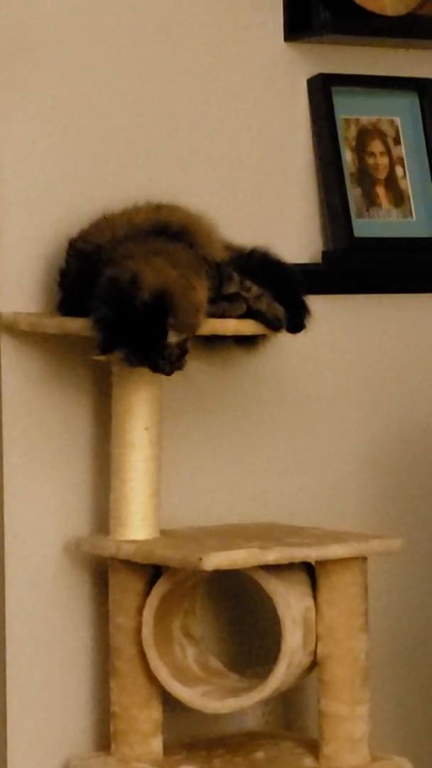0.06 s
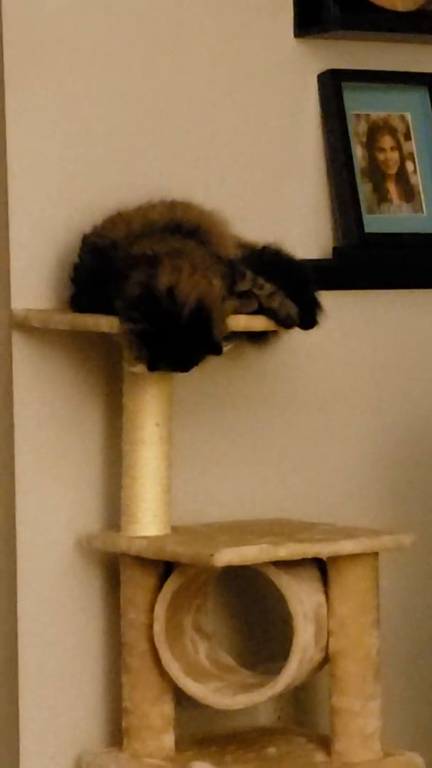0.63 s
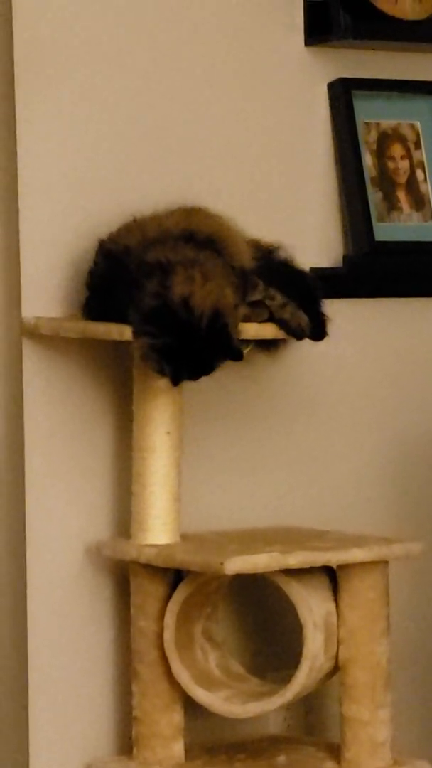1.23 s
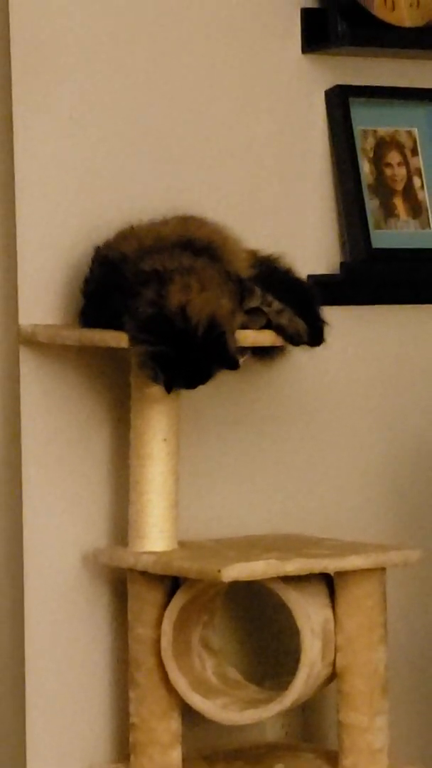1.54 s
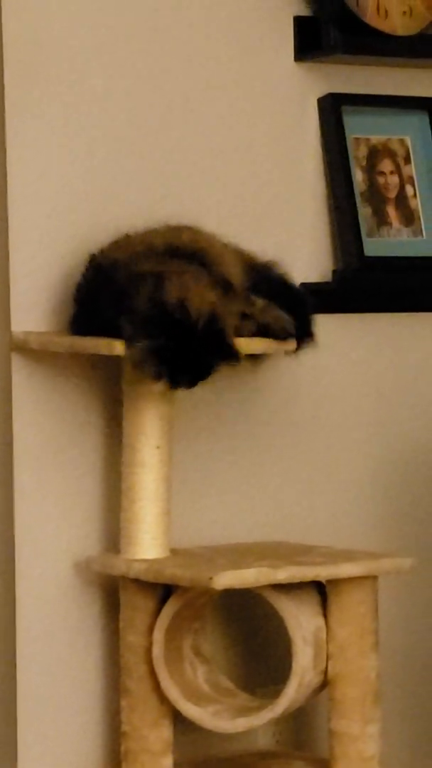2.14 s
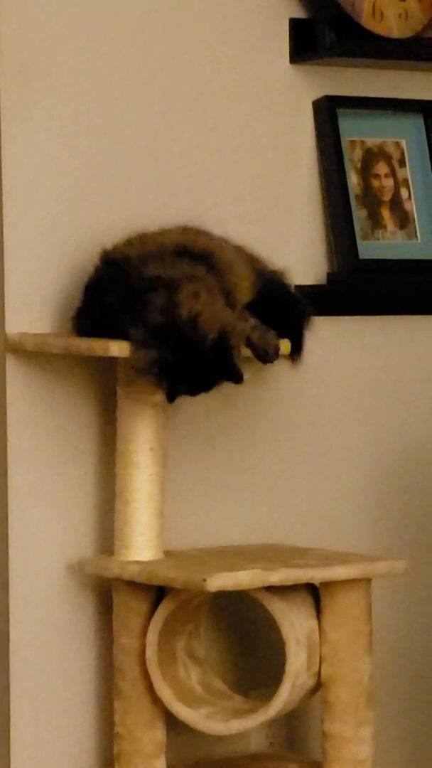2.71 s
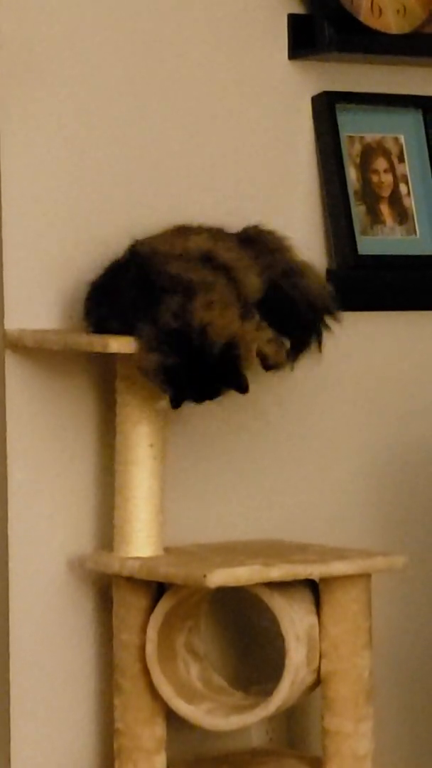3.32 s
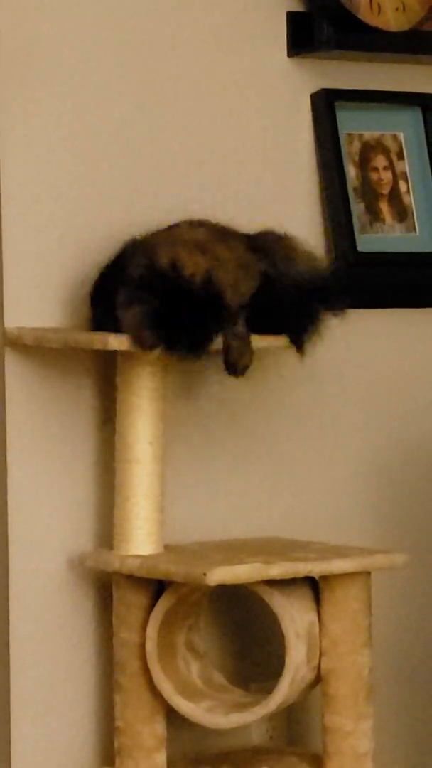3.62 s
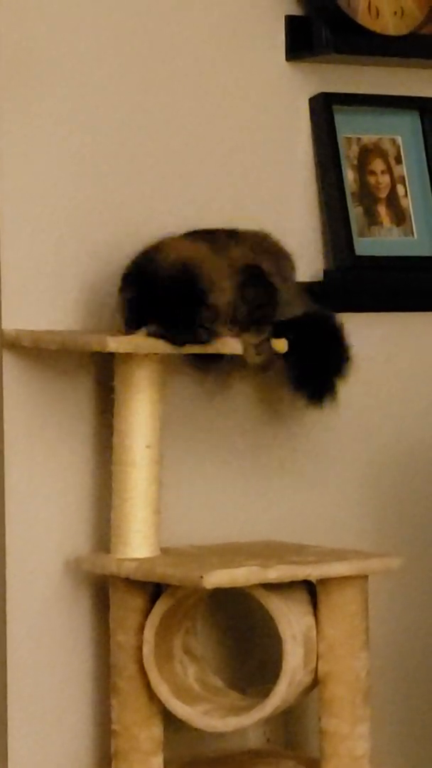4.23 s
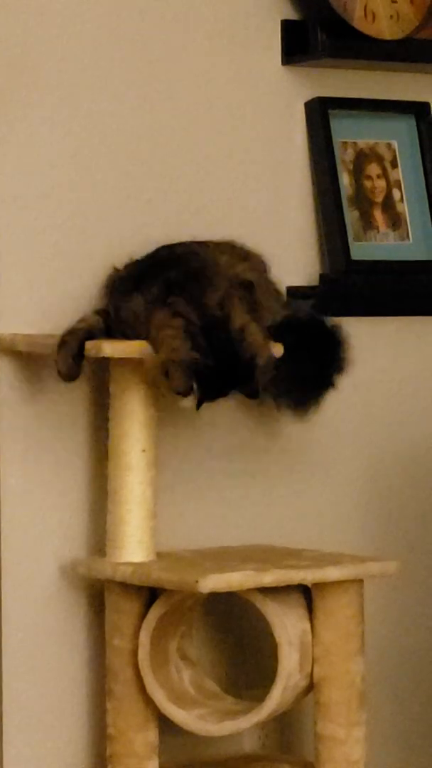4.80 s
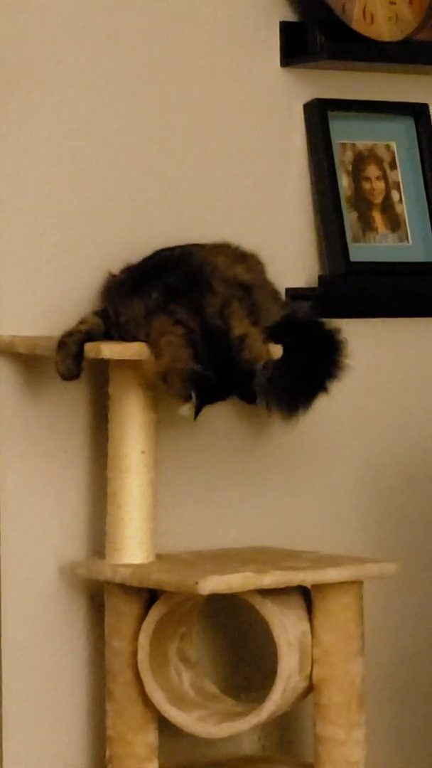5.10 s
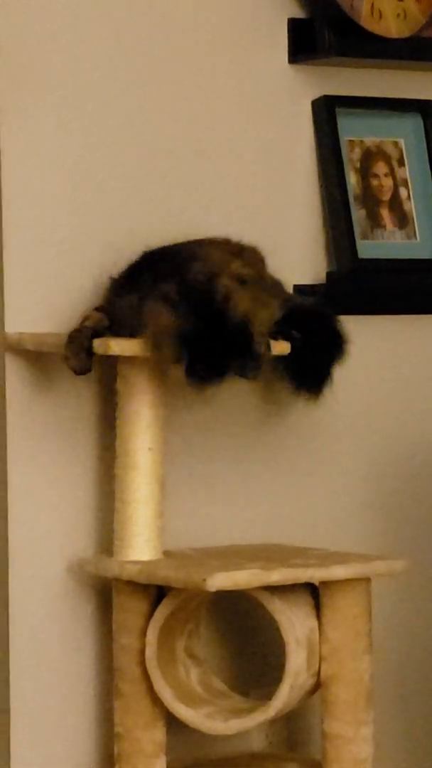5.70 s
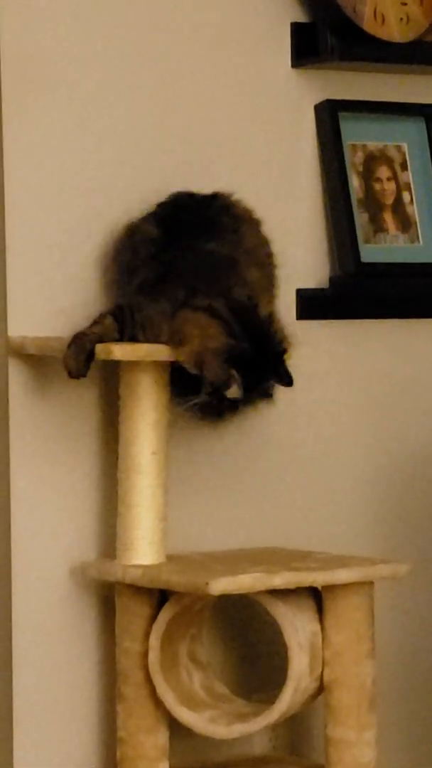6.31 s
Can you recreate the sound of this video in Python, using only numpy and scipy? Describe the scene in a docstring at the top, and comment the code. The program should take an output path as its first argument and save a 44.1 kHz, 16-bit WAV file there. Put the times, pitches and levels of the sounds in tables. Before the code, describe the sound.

A low, throbbing rumble like a purr, possibly an engine heard through the walls, runs throughout in a small, quiet room, with faint hum and microphone hiss. A very faint rustle opens, and a dull, deep thump comes at about 0.6 seconds. The throbbing is strongest from about 1 to 3 seconds, then gradually weakens. A cat on a carpeted climbing tower makes a light click near 2.9 seconds and soft paw scuffs and bumps around 3.6 seconds. Between 4.2 and 4.5 seconds comes the clearest event: a quick cluster of claws snagging carpet, with dull knocks on the boards. A second low drone swells briefly near 3.7 seconds and again near 5.7 seconds. At about 6.2 seconds the cat scuffs the carpet again, with a soft knock and two small ticks.

```python
"""Cat on a climbing tower, engine outside

In a quiet room a cat shifts about on a carpeted tower: claws snap fibres, paws scuff the pile and
knock the boards, fur brushes. Under it lies a low, throbbing purr, most likely a six-cylinder engine
heard through the walls, its neighbouring orders beating once a cycle. Behind that are a second,
fainter drone, a hum, outdoor rumble, a soft opening rustle and the microphone's own hiss."""
import sys
import numpy as np
from scipy import signal
from scipy.fft import rfft, irfft
from scipy.io import wavfile
from scipy.ndimage import uniform_filter1d

SR = 44100
rng = np.random.default_rng(int(sys.argv[2]) if len(sys.argv) > 2 else 0)


def generate_wav(sig):
    """Save sig (samples, or channels by samples) to the path in sys.argv[1] as 16-bit PCM at SR."""
    pcm = np.round(np.clip(np.atleast_2d(sig).T, -1, 1) * 32767).astype(np.int16)
    wavfile.write(sys.argv[1], SR, pcm)


N = 280035
T = np.arange(N) / SR


# Paw contacts: start_s, claw_db, scuff_db, knock_db, knock_centre_hz, decay_s
PAW_CONTACTS = [(2.947, -95.5, -83, -65, 520, 0.0043), (3.552, -77, -70, -61.5, 1100, 0.034),
                (3.654, -73.5, -71.5, -55, 174, 0.015), (4.184, -79.5, -72.5, -62, 513, 0.11),
                (4.238, -46.5, -80, -42, 240, 0.0074), (4.254, -50.5, -59.5, -52, 208, 0.013),
                (4.322, -51, -56.5, -55.5, 900, 0.0071), (4.326, -66.5, -80, -42, 231, 0.0051),
                (4.446, -77, -69, -60, 482, 0.023), (6.095, -92, -81, -75.5, 640, 0.026),
                (6.186, -75, -56.5, -57, 190, 0.033), (6.193, -82, -64, -66, 600, 0.012),
                (6.241, -80, -65, -67, 200, .011)]
# Tower resonances: pitch_hz, width_hz, gain_db
TOWER_MODES = [(171, 12, 8), (237.8, 12.8, 3.5), (470, 36, -4.5), (588, 88, -5.5), (839, 36, -1.5),
               (990, 110, -6.5), (1670, 110, -4)]
# Carpet scuff spectrum: freq_hz, gain_db
SCUFF_SPECTRUM = [(400, 10.5), (900, 4.5), (1250, -10.5), (1640, 1.5), (1900, -7), (2300, 6.5),
                  (3200, -16.5), (4230, -14), (5300, -29), (6760, -6.5), (8200, -30), (9500, -23),
                  (12000, -32)]

def paws(reach_octaves=0.51, landing_s=0.0025):
    """Each paw scuffs the carpet and rings the board modes near its knock centre."""
    scuff, drives = 0, np.zeros((len(TOWER_MODES), N))
    mode_hz = np.array(TOWER_MODES)[:, :1]
    for start_s, _, scuff_db, knock_db, centre_hz, decay_s in PAW_CONTACTS:
        contact = fade(start_s, decay_s)
        scuff += undb(scuff_db) * contact * (1 - fade(start_s, landing_s))
        coupling = np.exp(-(np.log2(mode_hz / centre_hz) / reach_octaves) ** 2)
        drives += undb(knock_db) * coupling * contact
    boards = sum(undb(db) * band(drive * rng.standard_normal(N), hz, width_hz)
                 for drive, (hz, width_hz, db) in zip(drives, TOWER_MODES))
    return colour(scuff * fibres(rate_hz=5600, spread_db=-0.5), SCUFF_SPECTRUM) + boards


# Claw crackle spectrum: freq_hz, gain_db
CLAW_SPECTRUM = [(900, -36), (2000, -16.5), (2600, -5.5), (3170, 0), (3700, -8), (4400, -1.5), (5100, -5.5),
                 (5900, -5.5), (7300, -11), (9000, -10.5), (12000, -20.5), (15500, -33)]

def claws(catch_db=3, catch_s=0.00095):
    """At each paw contact the claws catch with a snap, then tear at the pile."""
    grip = sum(undb(db) * (undb(catch_db) * fade(start_s, catch_s) + fade(start_s, decay_s))
               for start_s, db, _, _, _, decay_s in PAW_CONTACTS)
    return colour(grip * fibres(rate_hz=2400, spread_db=5), CLAW_SPECTRUM)


def fibres(rate_hz, spread_db):
    """Carpet fibres letting go: dense clicks of random size and sign."""
    snaps = (rng.random(N) < rate_hz / SR) * rng.choice([-1, 1], N)
    size_db = spread_db * np.minimum(rng.exponential(size=N), 2)
    return unit(snaps * undb(size_db))


# Small hard contacts: start_s, pitch_hz, level_db, decay_s
TICK_EVENTS = [(.93, 5500, -82, 0.0044), (2.219, 13100, -71.5, 0.0043), (2.855, 3505, -61, .004),
               (2.947, 1400, -71.5, 0.0057), (5.086, 9000, -74, .007), (6.186, 4270, -61.5, .0035),
               (6.241, 4200, -65, 0.0028)]

def ticks(overtone_ratio=2.08, overtone_db=-13.5, grit_db=-7):
    """A claw tip or the creaking frame ticks: a short ping, its overtone and a little grit."""
    noise, out = rng.standard_normal(N), 0
    for start_s, hz, db, decay_s in TICK_EVENTS:
        phase = 2 * np.pi * hz * (T - start_s)
        ping = np.sin(phase)
        if hz * overtone_ratio < CUTOFF_HZ:
            ping += undb(overtone_db) * np.sin(overtone_ratio * phase)
        grit = undb(grit_db) * band(noise, hz, width_hz=0.15 * hz)
        out += undb(db) * fade(start_s, decay_s) * (ping + grit)
    return out


# Fur strokes: centre_s, level_db, half_length_s
FUR_STROKES = [(1.06, -81.5, 0.073), (1.45, -90.5, 0.15), (1.82, -89, .05), (2.0, -89, 0.05)]
# Fur friction spectrum: freq_hz, gain_db
FUR_SPECTRUM = [(3500, -26.5), (5000, -7), (5500, 1.5), (6000, -1), (6600, -10), (7500, -6.5), (8400, -8.5),
                (9400, -3.5), (11000, -26)]

def fur():
    """The coat slides over the carpet in soft swells of high hiss."""
    return swells(FUR_STROKES) * colour(rng.standard_normal(N), FUR_SPECTRUM)


# Engine working-cycle rate: time_s, rate_hz
CYCLE_RATE = [(0, 12.087), (.33, 12.117), (.75, 12.653), (2.35, 12.352), (3, 12.745), (4.2, 12.961),
              (4.58, 12.756), (5.7, 13.127), (6.35, 13.227)]
# Firing note, order 6: time_s, level_db
FIRING_LEVEL = [(0, -52), (.65, -43.5), (1.35, -55.5), (1.9, -47.5), (3.3, -46.5), (6.35, -57)]
# Main boom, order 9: time_s, level_db
NINTH_LEVEL = [(0, -54.5), (1, -48.5), (1.27, -38), (1.62, -50.5), (1.95, -36), (2.75, -36.5),
               (3.25, -45.5), (5, -52.5), (6.35, -68.5)]
# Upper boom, order 11: time_s, level_db
ELEVENTH_LEVEL = [(0, -58.5), (1.1, -49), (1.4, -41.5), (1.8, -42), (2.4, -53.5), (6.35, -68.5)]
# Highest boom, order 12: time_s, level_db
TWELFTH_LEVEL = [(0, -55.5), (.85, -47), (1.35, -63), (2.2, -56.5), (3.5, -68), (6.35, -72.5)]
# Rumble that exhaust, weak orders and walls follow: time_s, level_db
RUMBLE_LEVEL = [(0, -67.5), (.3, -66.5), (.6, -58.5), (2.25, -62), (2.8, -68), (4.2, -74.5), (5.2, -82),
                (6.35, -76)]
# Weak engine orders: order, level_re_rumble_db
WEAK_ORDERS = [(4, -2.5), (8, 2), (13, -8), (15, -2), (16, -6.5), (17, -9), (18, 2), (19, -8.5), (20, -10),
               (23, -3.5), (24, -9.5), (27, -11), (30, -17), (31, -16), (32, -16.5), (37, -19), (60, -29.5)]
# Exhaust noise spectrum: freq_hz, gain_db
EXHAUST_SPECTRUM = [(40, -22.5), (70, -7), (100, 4.5), (140, 3), (170, -0.5), (210, -2.5), (290, -4),
                    (330, -11.5), (400, -10), (520, -17.5), (660, -31), (770, -26.5), (900, -29.5),
                    (1200, -37.5), (2000, -50.5)]

def engine(tenth_db=-6.5, waver_db=2, wander_turns=0.049, throb_depth=0.14, exhaust_db=4):
    """Unequal cylinders sound at multiples of the cycle rate, over throbbing exhaust noise."""
    cycle_hz, rumble_db, ninth_db = curve(CYCLE_RATE), curve(RUMBLE_LEVEL), curve(NINTH_LEVEL)
    turns = 0.1 + np.cumsum(cycle_hz) / SR
    throb_lead_s = np.interp(T, [1.534, 1.85], [0.025, 0])
    beat_turns = turns + cycle_hz * throb_lead_s
    orders = tone(6 * turns, curve(FIRING_LEVEL)) + tone(9 * turns, ninth_db)
    # The purr: orders 10 and 11 beat against 9.
    orders += tone(9 * turns + beat_turns, ninth_db + tenth_db)
    orders += tone(9 * turns + 2 * beat_turns, curve(ELEVENTH_LEVEL))
    orders += tone(12 * turns + rng.random(), curve(TWELFTH_LEVEL))
    # Weak orders waver on their way through the house.
    for order, db in WEAK_ORDERS:
        order_turns = round(order) * turns + rng.random() + wander_turns * drift(3)
        orders += tone(order_turns, rumble_db + db + waver_db * drift(2.7))
    purr = np.array([orders, delay(orders, lag_s=0.00029)]) * pan(left_db=0.07)
    throb = 1 + throb_depth * np.cos(2 * np.pi * beat_turns)
    return purr + diffuse(EXHAUST_SPECTRUM) * throb * undb(rumble_db + exhaust_db)


# Wall shudder spectrum: freq_hz, gain_db
SHUDDER_SPECTRUM = [(18, -30), (30, -18.5), (43, 1.5), (56, 0.5), (70, -6.5), (100, -28.5)]
# Dull thumps: centre_s, level_db, half_length_s
LOW_THUMPS = [(.59, -43, 0.089), (.89, -59, 0.057), (3.69, -53, 0.044)]

def walls(shudder_db=-55, rumble_ref_db=-59.5, follow_db_per_db=0.45):
    """The walls shudder with the engine's rumble; a few dull thumps join in."""
    shake = undb(shudder_db + follow_db_per_db * (curve(RUMBLE_LEVEL) - rumble_ref_db))
    return diffuse(SHUDDER_SPECTRUM) * (shake + swells(LOW_THUMPS))


# Second drone, pitch: time_s, pitch_hz
DRONE_GLIDE = [(0, 119.5), (3, 119.57), (3.85, 122.4), (4.6, 119), (5.3, 119.7), (5.7, 119.4),
               (6.35, 120.4)]
# Second drone, loudness: time_s, level_db
DRONE_LEVEL = [(0, -60.5), (1.1, -60.5), (3.2, -54), (3.75, -44.5), (4.2, -63.5), (5.3, -59), (5.7, -45),
               (6.1, -51)]
# Outdoor rumble spectrum: freq_hz, gain_db
STREET_SPECTRUM = [(40, -25.5), (90, -3), (135, -1), (190, -4), (250, -16), (330, -20), (450, -37),
                   (800, -50)]
# Microphone hiss spectrum: freq_hz, gain_db
HISS_SPECTRUM = [(200, 8.5), (500, 4), (830, -0.5), (1200, -1), (1800, -0.5), (2350, 6), (3200, -2),
                 (4500, -6.5), (6000, -12.5), (8500, -14.5), (10200, -11.5), (11600, -5.5), (13600, -5.5),
                 (14600, -2.5)]

def background(hum_hz=49.9, hum_db=-68.5, street_db=-57, hiss_db=-76):
    """A drone beating against the engine, a faint hum, muffled outdoor rumble and microphone hiss."""
    drone = tone(np.cumsum(curve(DRONE_GLIDE)) / SR, curve(DRONE_LEVEL))
    hum = tone(hum_hz * T, hum_db + 1.6 * drift(2))
    street = undb(street_db) * diffuse(STREET_SPECTRUM)
    hiss = undb(hiss_db) * diffuse(HISS_SPECTRUM)
    return drone + hum + street + hiss


# Opening rustle spectrum: freq_hz, gain_db
RUSTLE_SPECTRUM = [(400, 4.5), (520, 5.5), (680, -2.5), (900, -1.5), (1200, 0), (1550, -1.5), (1900, -12),
                   (3000, -14.5)]

def rustle(level_db=-78, centre_s=0.18, half_length_s=0.41):
    """A faint, flickering rustle that dies away in the first second."""
    envelope = swells([(centre_s, level_db + 1.7 * drift(13), half_length_s)])
    return envelope * diffuse(RUSTLE_SPECTRUM)


def room(x, split_hz=2000, low_t60_s=0.33, high_t60_s=0.2, gap_s=0.003, tail_db=-1):
    """Small room: direct sound, right ahead of left, plus a dense tail that loses its treble first."""
    t = T[:SR // 2]
    noise = rng.standard_normal((2, len(t)))
    low = signal.sosfilt(signal.butter(2, split_hz, fs=SR, output="sos"), noise)
    high = signal.sosfilt(signal.butter(2, split_hz, "high", fs=SR, output="sos"), noise)
    tail = (low * 1000 ** (-t / low_t60_s) - high * 1000 ** (-t / high_t60_s)) * (t > gap_s)
    wet = signal.fftconvolve(x[None], tail / np.linalg.norm(tail[0]), axes=1)[:, :N]
    direct = np.array([delay(x, lag_s=0.00005), x])
    return direct + undb(tail_db) * wet


def diffuse(spectrum, coherence_hz=650):
    """Room noise at two close microphones: alike in the bass, unrelated in the treble."""
    mid, side = colour(rng.standard_normal((2, N)), spectrum)
    coherence = 0.98 * np.exp(-(np.fft.rfftfreq(N, 1 / SR) / coherence_hz) ** 2)
    mid = irfft(rfft(mid) * np.sqrt(1 + coherence), N)
    side = irfft(rfft(side) * np.sqrt(1 - coherence), N)
    return unit(np.array([mid + side, mid - side]))


def colour(x, spectrum):
    """Minimum-phase filter through (freq_hz, gain_db) rows, scaled to keep white-noise power."""
    size = 2 ** 19
    hz, db = np.transpose(spectrum)
    bin_hz = np.maximum(np.fft.rfftfreq(size, 1 / SR), 1)
    octaves_outside = np.maximum(np.log2(bin_hz / hz[-1]), 0) + np.maximum(np.log2(hz[0] / bin_hz), 0)
    gain = unit(undb(np.interp(np.log(bin_hz), np.log(hz), db) - 20 * octaves_outside))
    cepstrum = irfft(np.log(gain))
    cepstrum[1:size // 2] *= 2
    cepstrum[size // 2 + 1:] = 0
    return irfft(rfft(x, size) * np.exp(rfft(cepstrum)))[..., :N]


def band(x, hz, width_hz):
    """Resonance that keeps white-noise power."""
    t = T[:SR // 5]
    ring = np.exp(-np.pi * width_hz * t) * np.cos(2 * np.pi * hz * t)
    edges_hz = [0.6 * hz, min(1.6 * hz, 0.49 * SR)]
    ring = signal.sosfilt(signal.butter(1, edges_hz, "band", fs=SR, output="sos"), ring)
    return signal.oaconvolve(x, ring / np.linalg.norm(ring))[:N]


def drift(rate_hz):
    """Smooth random motion, rms 1."""
    hold = int(SR / rate_hz)
    steps = np.repeat(rng.standard_normal(N // hold + 1), hold)
    return unit(uniform_filter1d(uniform_filter1d(steps, hold), hold)[:N])


def tone(turns, rms_db):
    """Sinusoid from a phase in turns."""
    return np.sqrt(2) * undb(rms_db) * np.cos(2 * np.pi * turns)


def fade(start_s, decay_s):
    """Sudden start, exponential decay."""
    return (T >= start_s) * np.exp(-np.clip((T - start_s) / decay_s, 0, 50))


def swells(table):
    """Gaussian rise and fall per (centre_s, level_db, half_length_s) row."""
    return sum(undb(db) * np.exp(-((T - centre_s) / half_s) ** 2) for centre_s, db, half_s in table)


def curve(table):
    """Straight lines through (time_s, value) rows."""
    return np.interp(T, *np.transpose(table))


def delay(x, lag_s):
    """Fractional-sample delay."""
    return np.interp(T - lag_s, T, x)


def pan(left_db):
    """Stereo gains, left over right by left_db."""
    return undb(np.array([[1], [-1]]) * left_db / 2)


def undb(db):
    """Decibels to gain."""
    return 10 ** (np.asarray(db) / 20)


def unit(x):
    """Scale to rms 1."""
    return x / np.sqrt(np.mean(x ** 2))


def scene(tick_send_db=-3):
    """The cat on its tower, over the purr from outside."""
    taps = ticks()  # drier than the paws
    contacts = (room(paws() + fur() + undb(tick_send_db) * taps) + taps) * pan(left_db=2.5)
    crackle = room(claws()) * pan(left_db=0.5)
    return contacts + crackle + engine() + walls() + background() + rustle()


CUTOFF_HZ = 15700

def record(dry):
    """Steep low-pass on the top treble."""
    return signal.sosfilt(signal.ellip(10, 0.2, 80, CUTOFF_HZ, fs=SR, output="sos"), dry)


dry = scene()
out = record(dry)
generate_wav(out)
```